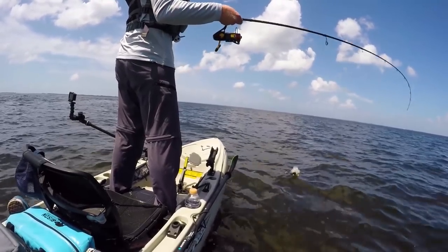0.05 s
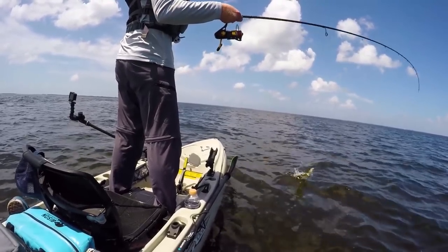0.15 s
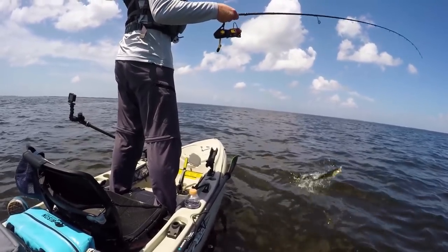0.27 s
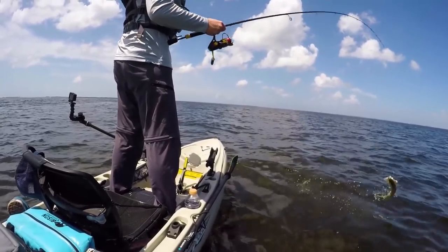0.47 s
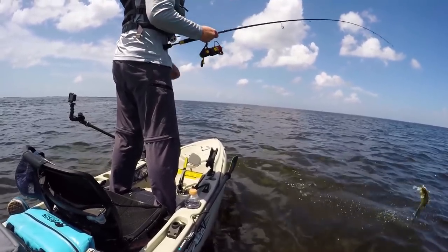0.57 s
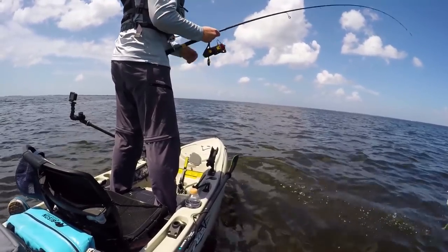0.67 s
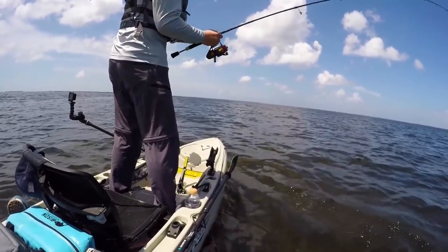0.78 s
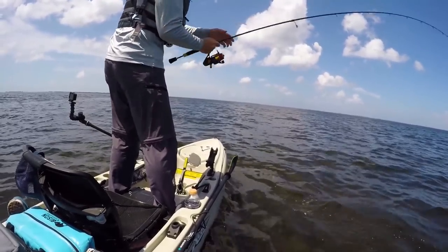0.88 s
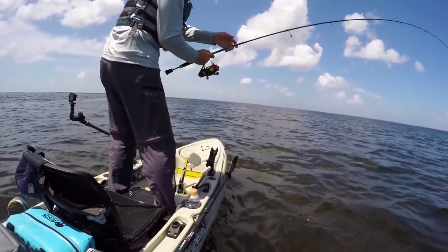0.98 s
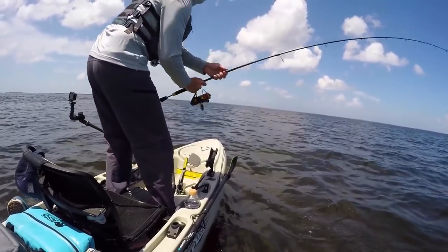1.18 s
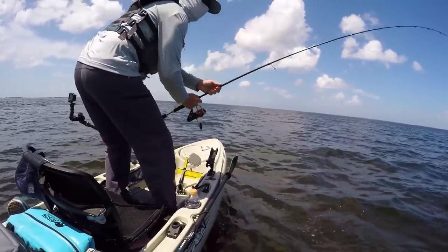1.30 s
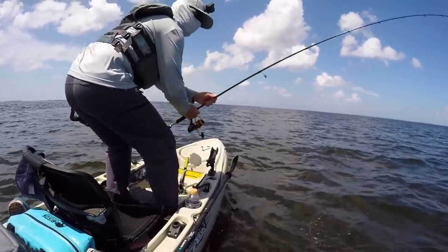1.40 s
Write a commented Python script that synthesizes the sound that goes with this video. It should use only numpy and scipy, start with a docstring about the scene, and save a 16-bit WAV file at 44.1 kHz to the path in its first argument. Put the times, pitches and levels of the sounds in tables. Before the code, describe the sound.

Irregular hollow knocks of wavelets against a small boat's hull, loudest near the start, followed by ticking droplets and bubbly fizz over quiet lapping hiss, low hull boom and faint electronic whine, close microphone on deck outdoors.

```python
"""Wavelets slap the hollow plastic hull of a small boat on open water, heard through a camera fixed to the deck.
Faint slaps open the scene; near 0.2 s a strong cluster rings the hull, and its splash falls back as fine spray.
Weaker slaps follow, a second strong group comes near 0.9 s with a swell of the boom, and light slaps end it.
Slaps excite damped hull modes, drops are short noise bursts with a ring, and fizz is a cloud of dying sines.
Throughout, filtered noise gives the boom of the rocking hull, the lapping hiss and the faint camera whine."""
import sys
import numpy as np
from scipy import signal
from scipy.fft import rfft, irfft
from scipy.io import wavfile
from scipy.ndimage import uniform_filter1d, map_coordinates

SR = 44100
rng = np.random.default_rng(int(sys.argv[2]) if len(sys.argv) > 2 else 0)


def inscribe(sig):
    """Save sig as 16-bit PCM at rate SR to the path in sys.argv[1].

    A 1-D sig is mono; a 2-D sig holds one channel per row.
    Samples are clipped to [-1, 1] before scaling.
    """
    pcm = np.round(np.clip(np.atleast_2d(sig).T, -1, 1) * 32767)
    wavfile.write(sys.argv[1], SR, pcm.astype(np.int16))


def ratio(d):
    """dB to gain"""
    e = np.asarray(d, float) / 20
    return 10 ** e


N = 63945  # length [samples]


def unit(x):
    """Normalisation: scales a signal to rms 1."""
    return x / np.sqrt(np.mean(x ** 2) + 1e-20)


def curve(rows):
    """Linear interpolation: one value per sample from (time [s], value) rows."""
    time_s, value = np.transpose(rows)
    return np.interp(np.arange(N) / SR, time_s, value)


def wobble(rate):
    """Band-limited fluctuation: a smooth random curve with rate knots a second."""
    knots = rng.standard_normal(int(N * rate / SR) + 4)
    return map_coordinates(knots, [np.arange(N) * rate / SR])


def bell(hz, centre_hz, octaves):
    """Gaussian weighting on a logarithmic frequency axis."""
    return np.exp(-.5 * (np.log2((hz + 1) / centre_hz) / max(octaves, .05)) ** 2)


def rush(spectrum, patchy_db):
    """Spectral shaping of random noise: patches of random gain, then a colour, at rms 1."""
    patches = signal.stft(rng.standard_normal(N + 512), nperseg=512)[2]
    field = uniform_filter1d(uniform_filter1d(rng.standard_normal(patches.shape), 6, 0), 6, 1)
    noise = signal.istft(patches * ratio(patchy_db * unit(field)), nperseg=512)[1][:N]
    f, db = np.transpose(spectrum)
    log_hz = np.log(np.fft.rfftfreq(N, 1 / SR) + 1)
    colour = ratio(np.interp(log_hz, np.log(f), db))
    return unit(irfft(rfft(noise) * colour, N))


# Hull modes: (frequency [Hz], relative level [dB], 60 dB decay time [s])
HULL_MODES = [(82.5, -14, 0.27), (118, -5.5, 0.15), (150, -4.5, 0.086), (188.8, -10.5, 0.21),
              (244.8, -15, 0.19), (264.8, -9.5, 0.18), (332.7, -26.5, 0.26), (332.8, -12, 0.12),
              (444, -6, 0.061), (542, -4, 0.12), (600, -10.5, 0.14), (657.5, 6.5, 0.072), (740, 11, 0.035),
              (812.4, -6, 0.069), (906.3, 2.5, 0.066), (983.5, -10.5, 0.091), (1077.7, -6, 0.087),
              (1195.6, 1, 0.037), (1248, -10, 0.12), (1318, 0.5, 0.018), (1426, -15.5, 0.078),
              (1545, -9, 0.082), (1714, -21, 0.11)]
# Slaps on the hull: (time [s], peak level ahead of the deck filter [dB], frequency where the blow is
# strongest [Hz], spread [octaves], length of the wash [s])
HULL_SLAPS = [(.027, -40.5, 1215, 0.26, 0.0055), (.038, -47, 603, 0.036, 0.0049),
              (.048, -47.5, 603, 0.044, 0.0019), (.062, -41, 608, 0.052, 0.0065),
              (.091, -35.5, 1205, 0.25, 0.0062), (.101, -37, 1000, 0.97, 0.0073),
              (.111, -59, 777, 0.61, 0.003), (.138, -46, 1440, 0.28, 0.0018),
              (.2155, -22, 1070, 1.3, 0.0012), (.2185, -11, 905, 1.16, 0.0016),
              (.226, -16.5, 620, 1.5, 0.0026), (.232, -9, 780, 0.31, 0.0037), (.236, -14, 600, 0.4, 0.002),
              (.2408, -12, 710, 0.22, .0015), (.2545, -18.5, 726, 0.15, 0.0033),
              (.2625, -26.5, 630, 0.42, .002), (.235, -26.5, 280, 0.37, 0.011),
              (.278, -30.5, 860, 0.46, 0.0046), (.288, -36, 700, 0.2, 0.003),
              (.265, -35, 96.5, 0.51, 0.0066), (.27, -37, 302, 0.39, 0.033), (.3, -39.5, 860, 0.3, 0.037),
              (.33, -51.5, 864, 0.12, 0.08), (0.311, -39, 120, 0.12, 0.0072), (.385, -48, 94, 0.16, 0.011),
              (.418, -45.5, 635, 0.15, 0.0017), (.42, -40.5, 118, 0.3, 0.013),
              (.472, -45.5, 131, 0.17, 0.017), (.53, -49.5, 796, 0.069, 0.0019),
              (.5565, -34, 1260, 0.53, 0.0098), (.567, -38, 920, 0.19, 0.0022),
              (.577, -36.5, 1350, 0.45, 0.0027), (.575, -45.5, 273, 0.29, 0.012),
              (.585, -39.5, 714, 0.54, 0.009), (.64, -47, 790, 0.51, 0.024),
              (.841, -40.5, 1520, 0.35, 0.005), (.853, -41.5, 1140, 0.62, 0.02),
              (.873, -48.5, 740, .25, 0.0057), (.894, -31.5, 1360, 0.51, 0.025),
              (.897, -30, 740, 0.13, 0.0032), (.901, -27, 1290, 0.26, 0.014),
              (.907, -28.5, 1350, 0.12, 0.0012), (.912, -19.5, 789, 0.048, 0.0012),
              (.916, -21.5, 655, 0.27, 0.0012), (.926, -26, 696, 0.065, 0.0037),
              (.918, -36, 150, 0.33, 0.006), (.94, -47.5, 295, 0.39, 0.03), (.946, -44, 670, 0.18, 0.012),
              (1.282, -52.5, 865, 0.15, 0.036), (1.316, -43.5, 730, 0.17, 0.0097),
              (1.376, -43, 845, 0.44, 0.017), (1.396, -41, 960, 0.22, 0.0034),
              (1.412, -39, 1250, 0.31, 0.002), (1.431, -45, 264, 0.28, 0.01)]
LAG_S, LAG_POWER = .002, .8  # build-up time of a 700 Hz mode; lower modes are slower
WASH_EVEN_S = .02  # a wash this long is as strong as the first push of its slap, shorter ones are weaker
DECK_LOW_HZ, DECK_TOP_HZ = 66, 1900  # the band that the deck carries from the hull to the camera


def slaps():
    """Modal superposition: a push and a short wash of noise ring the damped hull modes near each blow's pitch."""
    out, t = np.zeros(N + 2 * SR), np.arange(SR // 2) / SR
    hz, level, t60 = np.transpose(HULL_MODES)[:, :, None]
    lag = LAG_S * (700 / hz) ** LAG_POWER
    decay = ratio(level - 60 * t / t60)
    build_up = 1 - np.exp(-t / lag)
    modes = decay * build_up * np.sin(2 * np.pi * hz * t)
    for start_s, db, centre_hz, octaves, wash_s in HULL_SLAPS:
        wash = rng.standard_normal(SR // 10) * np.exp(-(t[:SR // 10] / wash_s) ** 2)
        force = wash_s / WASH_EVEN_S * wash / np.linalg.norm(wash)
        force[0] += 1  # the first push
        response = (bell(hz, centre_hz, octaves) * modes).sum(0)
        sound = signal.fftconvolve(response, force)
        out[round(start_s * SR):][:len(sound)] += ratio(db) * sound / np.abs(sound).max()
    deck = signal.butter(5, (DECK_LOW_HZ, DECK_TOP_HZ), 'bandpass', fs=SR, output='sos')
    return signal.sosfilt(deck, out[:N])


# Drops and ticks of spray: (time [s], peak level [dB], frequency [Hz], spread [octaves])
SPRAY_DROPS = [(0.1359, -53, 2700, 0.29), (0.2695, -44.5, 2380, 0.35), (0.2808, -41.5, 3660, 0.23),
               (0.2872, -49, 5500, 0.51), (0.3012, -38.5, 3220, 0.4), (0.3147, -44, 3470, 0.54),
               (0.3436, -44, 4150, 0.62), (0.3547, -41.5, 3110, 0.54), (.3285, -48, 3330, 0.29),
               (0.3655, -44, 4510, 0.17), (0.413, -46, 2590, 0.26), (0.552, -44, 2160, 0.14),
               (0.594, -44, 3040, 0.23), (0.6146, -43.5, 3160, 0.38), (0.7105, -41.5, 3460, 0.5),
               (0.842, -42, 2210, 0.35), (0.892, -41.5, 2250, 0.11), (0.9745, -47, 2550, 0.6),
               (1.0196, -36, 3133, 0.11), (1.14, -56, 2400, 0.45), (1.1481, -47, 3690, 0.35),
               (1.1866, -50, 2840, 0.28), (1.206, -42.5, 2330, 0.2), (1.2915, -48, 2520, .3),
               (1.2953, -42.5, 2724, 0.17), (1.3059, -42, 3900, 0.13), (1.306, -42, 2560, 0.34),
               (1.3615, -43.5, 2880, 0.4), (1.3645, -41.5, 3760, 0.51), (1.4132, -39.5, 3380, 0.84),
               (1.4428, -40, 3240, 0.39), (.028, -44.5, 1720, 0.36), (.137, -44.5, 1746, 0.58),
               (.64, -47, 2050, 0.39), (.711, -44.5, 1240, 0.5), (.711, -50, 2060, 0.24),
               (1.139, -44.5, 1670, 0.33), (1.141, -48, 1120, 0.29), (1.021, -49, 4400, 0.08),
               (1.022, -45, 2250, 0.25), (1.036, -45.5, 2810, 0.31), (1.038, -61, 1740, 0.24),
               (0.302, -44.5, 6390, 0.43), (.3055, -44, 7860, .6), (.311, -53.5, 8500, 0.55),
               (0.316, -44.5, 7140, 0.4), (0.661, -53, 10570, 0.44), (.712, -54, 8800, 0.76),
               (0.827, -51, 7260, 0.19), (.826, -50.5, 12100, 0.25), (1.013, -50, 6940, 0.25),
               (1.0385, -49.5, 11500, 0.5), (1.207, -52, 8260, 0.41), (1.296, -48, 5720, 0.086),
               (1.364, -48, 13100, 0.54), (1.37, -52, 10000, 0.55), (1.413, -58, 7000, 0.53),
               (1.444, -48, 8000, 0.16)]
DROP_RISE_S = .001
DROP_T60_S, DROP_T60_POWER = 0.035, 0.39  # decay of a 3000 Hz drop; higher ones die faster
PLIP_DB = 1  # the ring of the trapped bubble against the noise of a drop, fading above 4000 Hz
CRACK_DB, CRACK_OCTAVES = -2, 0.74  # the broad crack of the impact against the noise of a drop


def drops():
    """Impact and bubble resonance: a brief ring in a burst of noise at its pitch, opened by a broad crack."""
    out, size = np.zeros(N + SR), 4096
    t, hz = np.arange(size) / SR, np.fft.rfftfreq(size, 1 / SR)

    def band_noise(centre_hz, octaves):
        """Band-pass filtering of random noise, at rms 1."""
        return unit(irfft(rfft(rng.standard_normal(size)) * bell(hz, centre_hz, octaves), size))

    for start_s, db, centre_hz, octaves in SPRAY_DROPS:
        noise = band_noise(centre_hz, octaves)
        crack = band_noise(centre_hz, CRACK_OCTAVES)
        plip = ratio(PLIP_DB) * np.sin(2 * np.pi * centre_hz * t) / (1 + (centre_hz / 4000) ** 4)
        t60 = DROP_T60_S * (3000 / centre_hz) ** DROP_T60_POWER
        fade = ratio(-60 * t / t60)
        rise = 1 - np.exp(-t / DROP_RISE_S)
        # the crack carries the fade twice, so it dies first
        burst = fade * rise * (noise + plip + ratio(CRACK_DB) * fade * crack)
        out[round(start_s * SR):][:size] += ratio(db) * burst / np.abs(burst).max()
    return out[:N]


FIZZ_SCATTER_DB = 9  # the loudest bubbles against the faintest


def bubbles(start_s, length_s, per_s, centre_hz, spread, life, db):
    """Random superposition of damped oscillators: tiny bubbles, each a sine that dies in a few cycles."""
    draw = rng.random((900, 2))[:int(per_s * length_s)]  # moment, loudness
    hz = centre_hz * np.exp(spread * rng.standard_normal((900, 1))[:len(draw)])
    k = np.arange(600)
    cycles = hz * k / SR
    level = ratio(db + FIZZ_SCATTER_DB * draw[:, 1:] ** 2)
    grains = np.exp(-cycles / life) * np.sin(2 * np.pi * cycles) * level
    grains = grains * ((hz > 1300) & (hz < 14000))  # bubbles outside this range stay silent
    at = ((start_s + draw[:, :1] * length_s) * SR).astype(int) + k
    return np.bincount(at.ravel(), grains.ravel(), N + 600)[:N]


# median bubble frequency, 1/e life in cycles, level of the faintest bubble
FIZZ_PER_S, FIZZ_HZ, FIZZ_CYCLES, FIZZ_DB = 420, 2944, 7.9, -61.5
SPRAY_PER_S, SPRAY_HZ, SPRAY_CYCLES, SPRAY_DB = 450, 4340, 2.8, -56.5
SPRAY_S, SPRAY_LENGTH_S = .275, .105  # the splash falls back as fine drops


def fizz():
    """Amplitude modulation: a bubble cloud follows the lapping level, with spray after the big slap."""
    lap_db = curve(LAPPING_LEVEL)
    steady = bubbles(0, N / SR, FIZZ_PER_S, FIZZ_HZ, 1.1, FIZZ_CYCLES, FIZZ_DB)
    steady = steady * ratio(lap_db - lap_db.mean())
    spray = bubbles(SPRAY_S, SPRAY_LENGTH_S, SPRAY_PER_S, SPRAY_HZ, 0.41, SPRAY_CYCLES, SPRAY_DB)
    return steady + spray


# Boom of the rocking hull: (time [s], level ahead of a fixed lift [dB])
ROCKING_LEVEL = [(0.0, -63), (0.25, -67.5), (0.378, -60), (0.726, -67.5), (.9, -64), (.96, -50.5),
                 (1.082, -68), (1.45, -61.5)]
# Colour of the boom: (frequency [Hz], relative density [dB per Hz])
BOOM_SPECTRUM = [(35, -57), (60, -44), (90, -5.5), (125, -3.5), (180, -18.5), (280, -9.5), (420, -26),
                 (600, -58)]


def hull_boom():
    """Noise modulation: patchy low noise swells and sinks as the hull rocks."""
    return ratio(curve(ROCKING_LEVEL) + 3.5) * rush(BOOM_SPECTRUM, patchy_db=4.5)


# Lapping water: (time [s], level ahead of a fixed lift [dB]); the fizz follows its shape
LAPPING_LEVEL = [(0.0, -58.5), (0.14, -58), (0.444, -56.5), (0.806, -59), (1.45, -56)]
# Colour of the hiss: (frequency [Hz], relative density [dB per Hz])
HISS_SPECTRUM = [(30, -12.5), (150, 8), (450, -4), (680, -1), (1500, -8), (2000, -9), (2700, -5),
                 (4500, -11.5), (7500, -16.5), (10000, -20), (12000, -21.5), (14600, -23.5), (15300, -31)]


def lapping_hiss():
    """Broadband turbulence noise: a coloured hiss whose level drifts and trembles slightly."""
    tremble_db = 0.12 * wobble(20.6) + 0.16 * wobble(60)
    return ratio(curve(LAPPING_LEVEL) + 2.5 + tremble_db) * rush(HISS_SPECTRUM, patchy_db=0.13)


# Centres of the whine bands: (frequency [Hz])
WHINE_CENTRES = [4790, 9582, 10790, 14373]
# One row per whine band: (rms level [dB], half width [Hz])
WHINE_BANDS = [(-74, 56), (-75, 67), (-80, 60), (-74.5, 110)]


def whine():
    """Resonance filtering: noise in long-skirted resonances makes the fuzzy bands of the camera's electronics."""
    f = np.fft.rfftfreq(N, 1 / SR)
    out = np.zeros(N)
    for hz, (db, width) in zip(WHINE_CENTRES, WHINE_BANDS):
        resonance = 1 / (1 + 1j * (f - hz) / width)
        out += ratio(db) * unit(irfft(rfft(rng.standard_normal(N)) * resonance, N))
    return out


def scene():
    """Linear superposition: all sources add at the one microphone."""
    return (slaps() + drops() + fizz() + hull_boom() + lapping_hiss() + whine())[None]


def band_limit(x):
    """A steep low-pass at the top of the band."""
    return signal.sosfilt(signal.butter(12, 15330, fs=SR, output="sos"), x)


MIC_LOW_HZ, MIC_TOP_HZ = 48, 15150


def record(dry):
    """Band limiting: the camera cuts deep bass gently and the top treble steeply."""
    hz = np.fft.rfftfreq(N, 1 / SR)
    bass_cut = 1 / np.sqrt(1 + (MIC_LOW_HZ / (hz + 1)) ** 6)
    treble_cut = 1 / np.sqrt(1 + (hz / MIC_TOP_HZ) ** 120)
    mix = irfft(rfft(dry) * bass_cut * treble_cut, N)
    return band_limit(mix)


dry = scene()
out = record(dry)
inscribe(out)
```